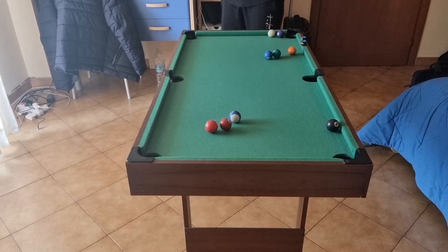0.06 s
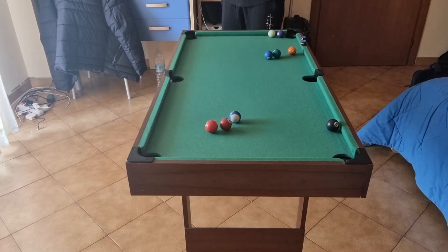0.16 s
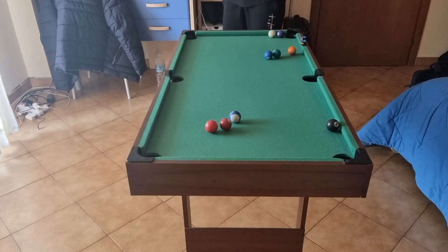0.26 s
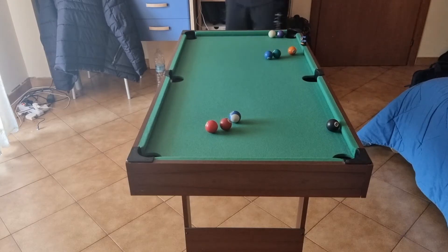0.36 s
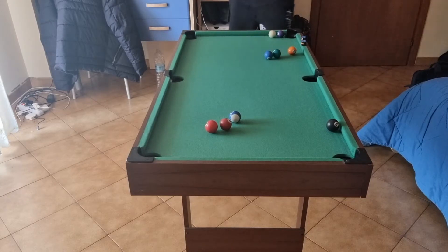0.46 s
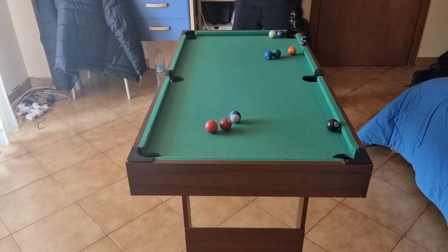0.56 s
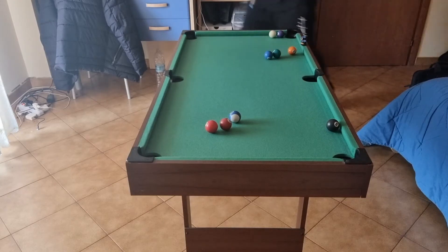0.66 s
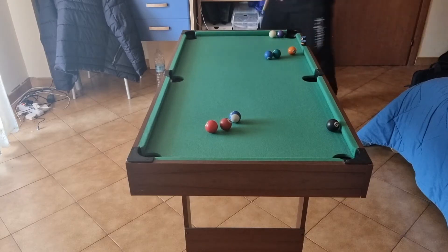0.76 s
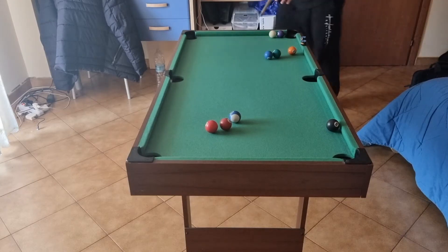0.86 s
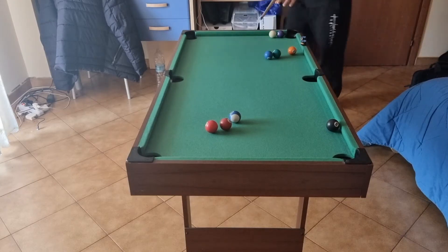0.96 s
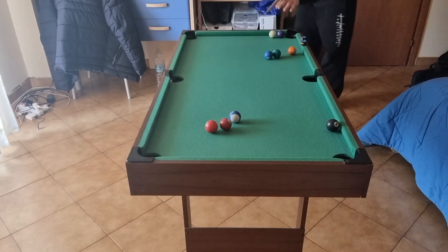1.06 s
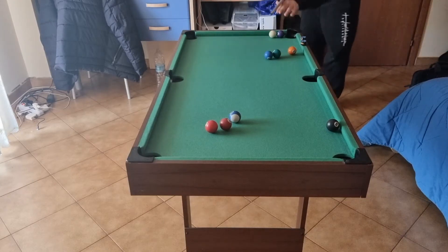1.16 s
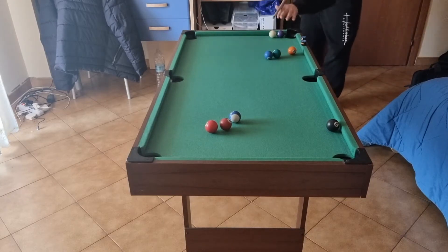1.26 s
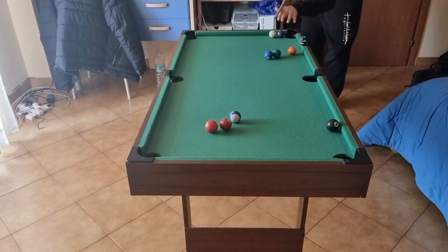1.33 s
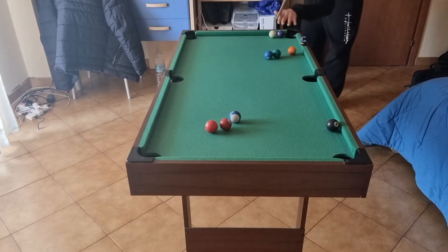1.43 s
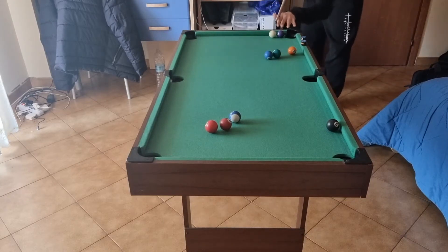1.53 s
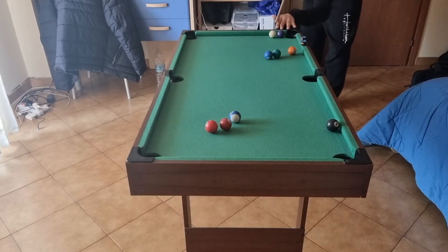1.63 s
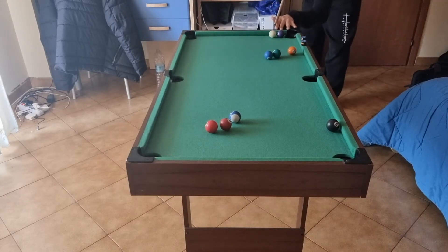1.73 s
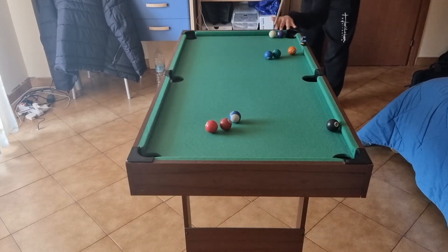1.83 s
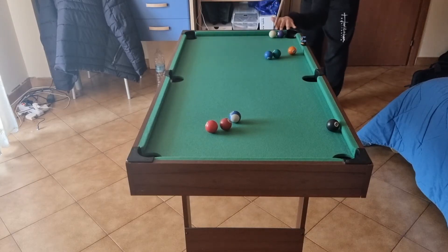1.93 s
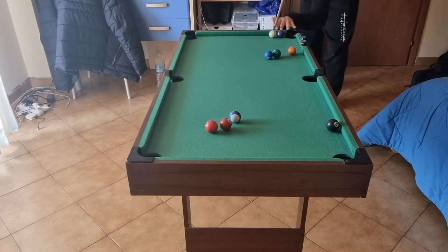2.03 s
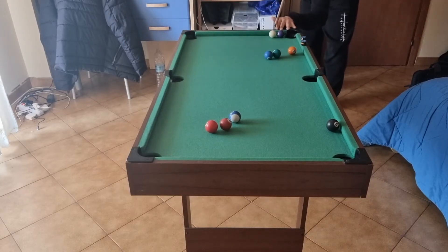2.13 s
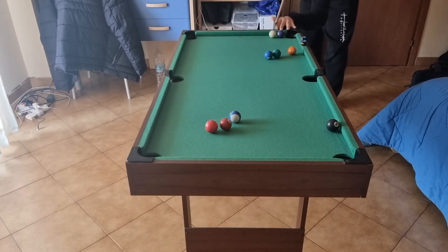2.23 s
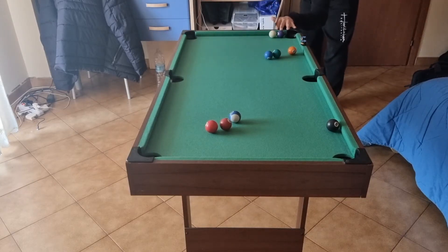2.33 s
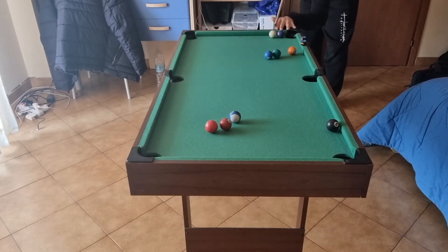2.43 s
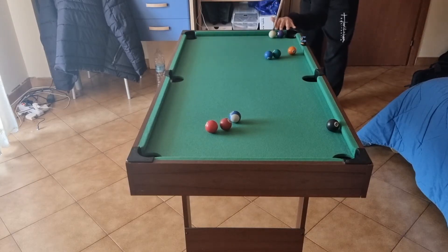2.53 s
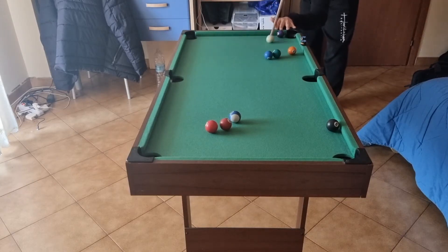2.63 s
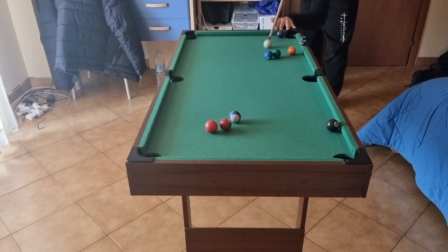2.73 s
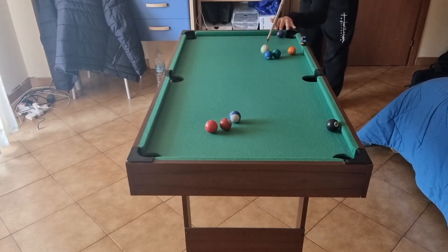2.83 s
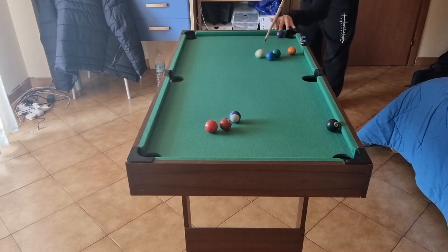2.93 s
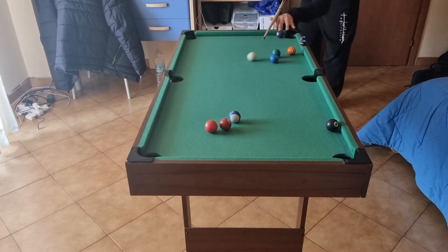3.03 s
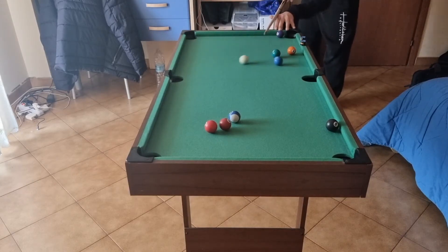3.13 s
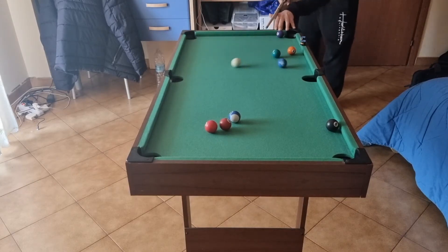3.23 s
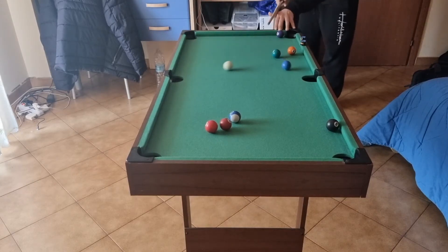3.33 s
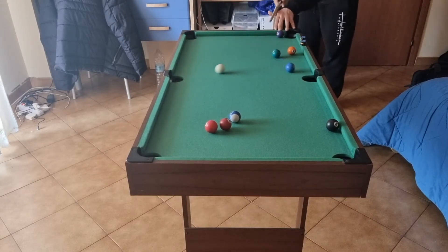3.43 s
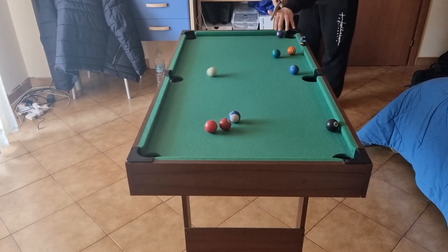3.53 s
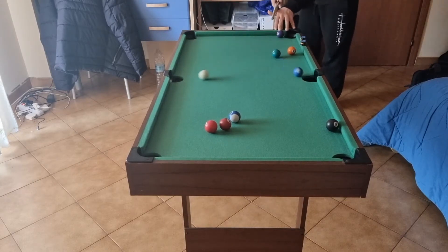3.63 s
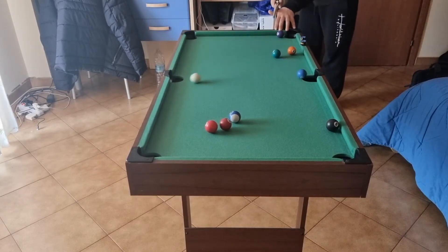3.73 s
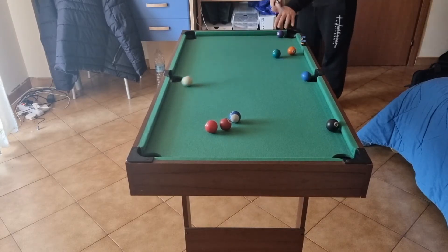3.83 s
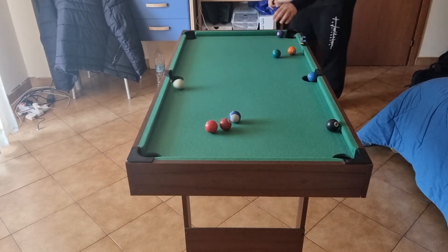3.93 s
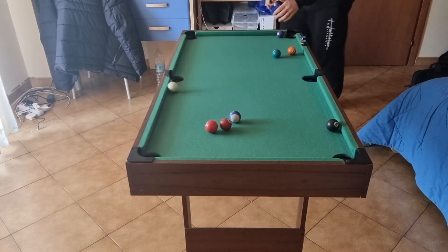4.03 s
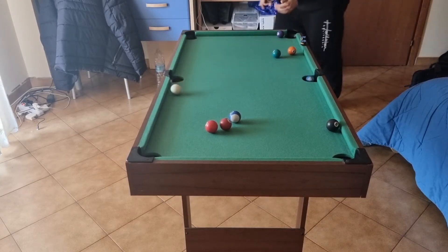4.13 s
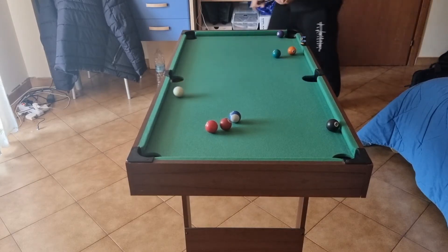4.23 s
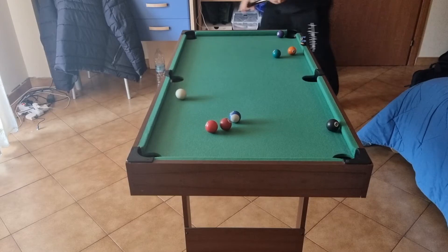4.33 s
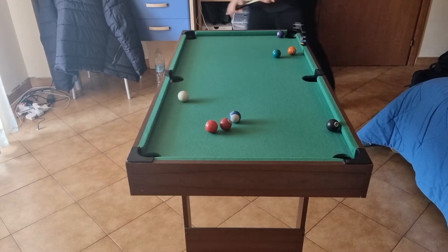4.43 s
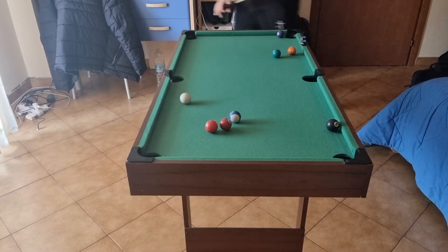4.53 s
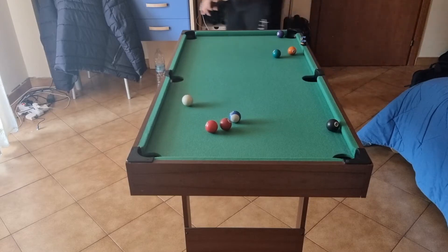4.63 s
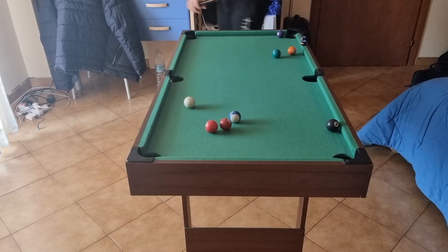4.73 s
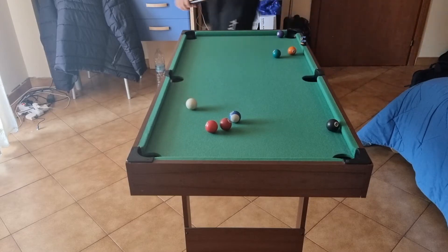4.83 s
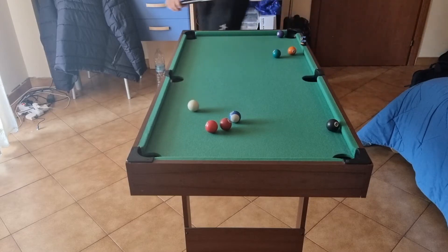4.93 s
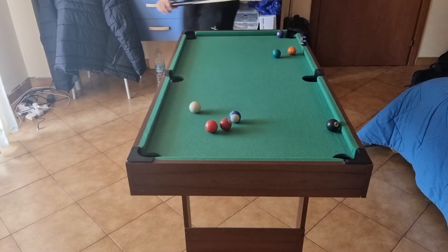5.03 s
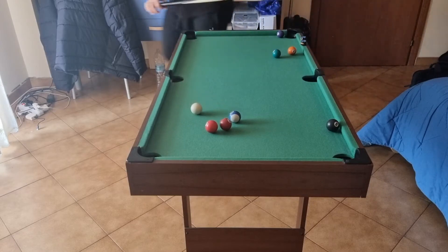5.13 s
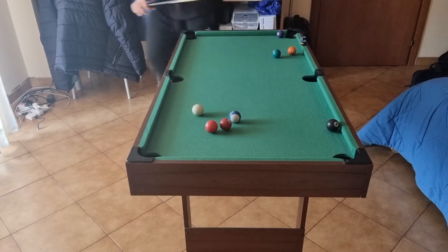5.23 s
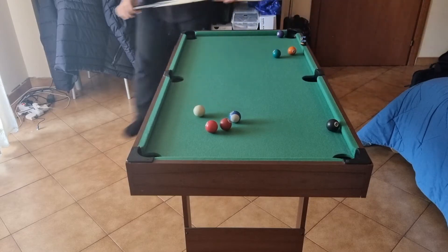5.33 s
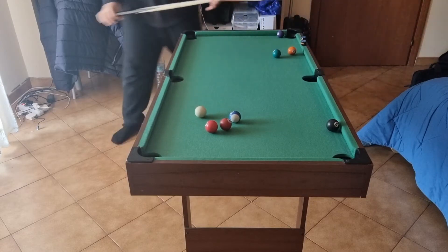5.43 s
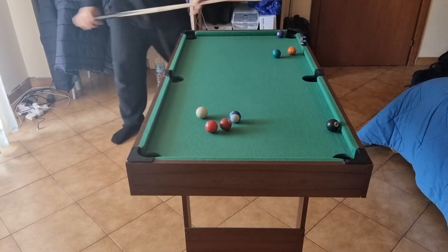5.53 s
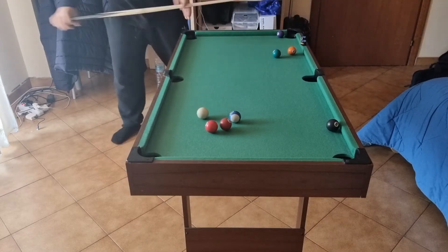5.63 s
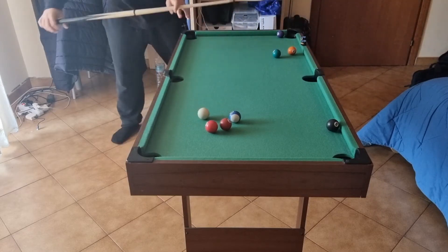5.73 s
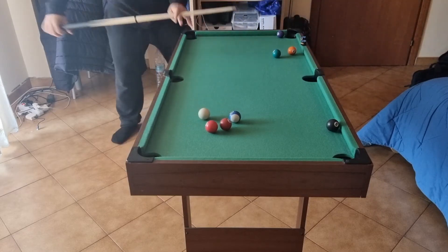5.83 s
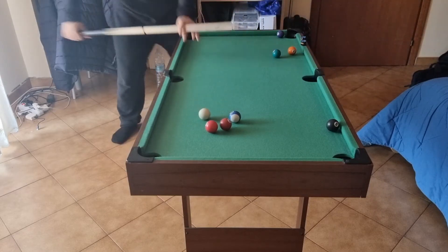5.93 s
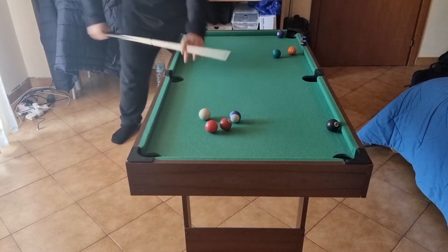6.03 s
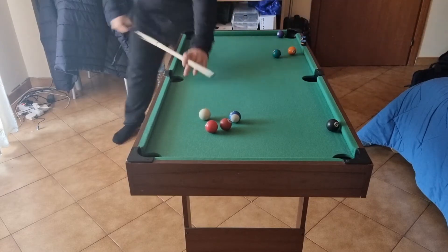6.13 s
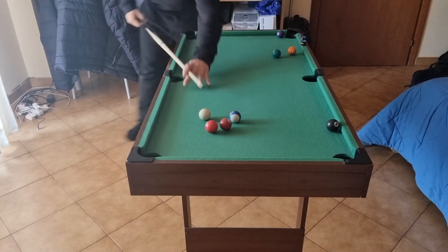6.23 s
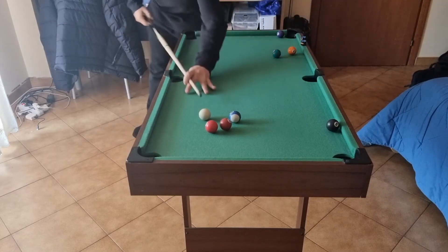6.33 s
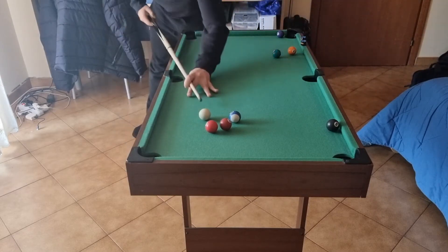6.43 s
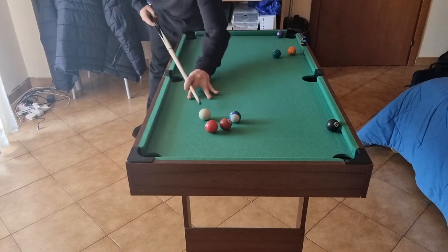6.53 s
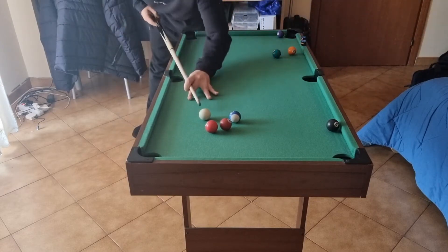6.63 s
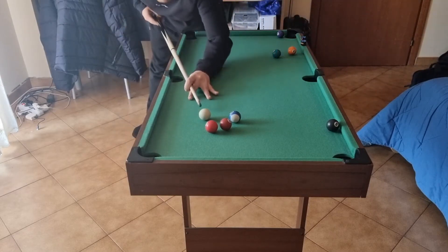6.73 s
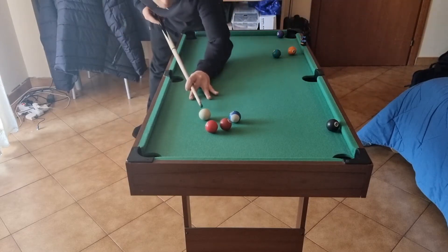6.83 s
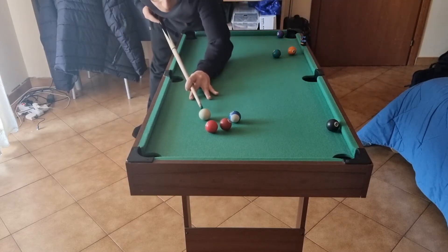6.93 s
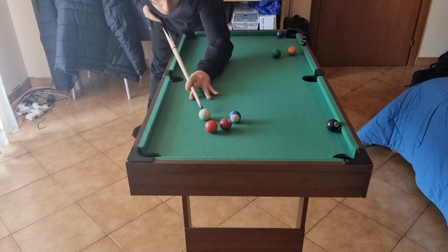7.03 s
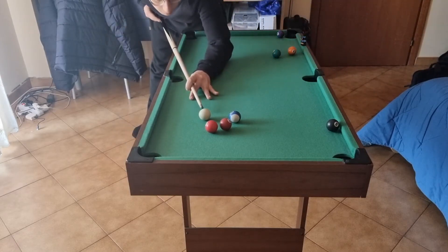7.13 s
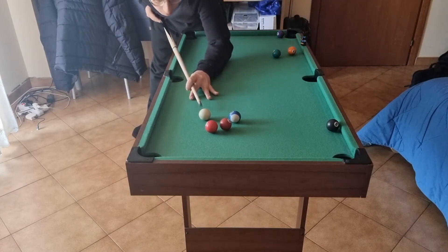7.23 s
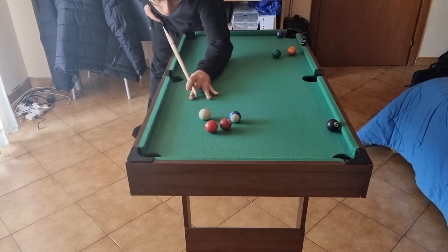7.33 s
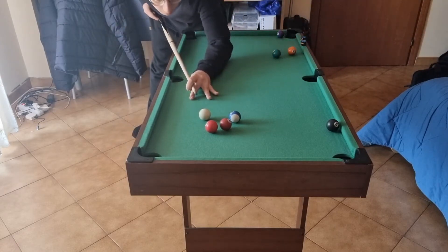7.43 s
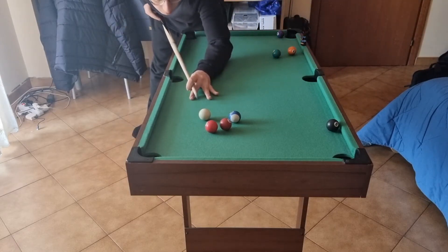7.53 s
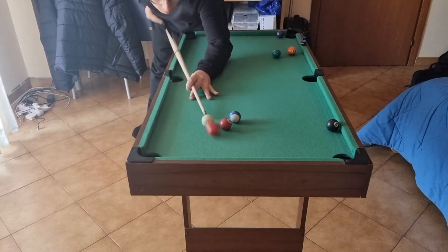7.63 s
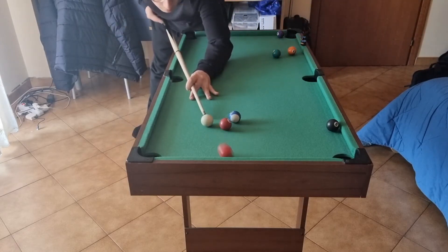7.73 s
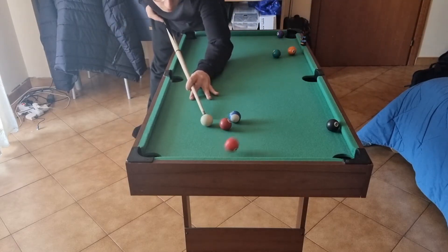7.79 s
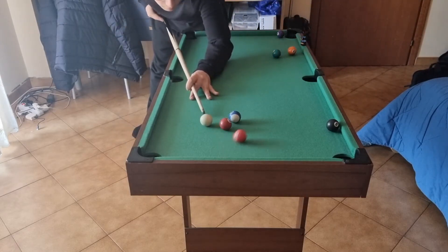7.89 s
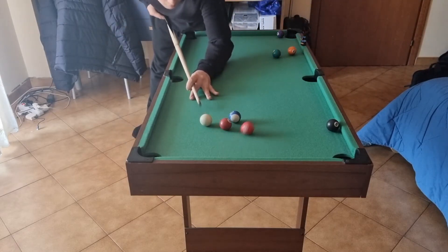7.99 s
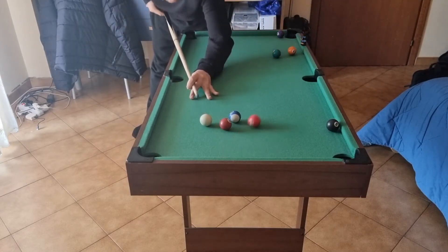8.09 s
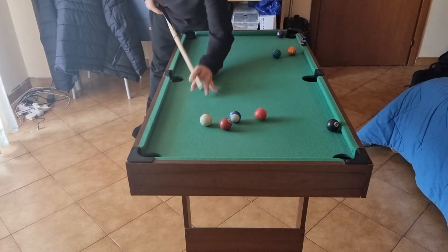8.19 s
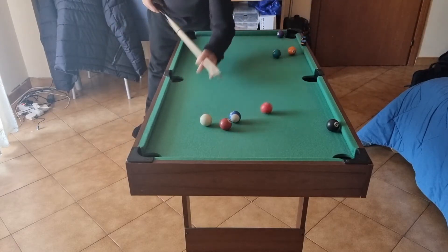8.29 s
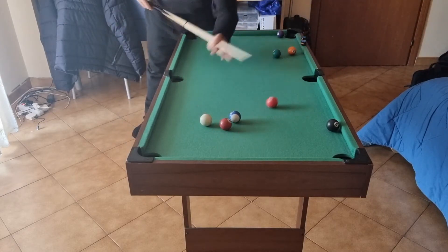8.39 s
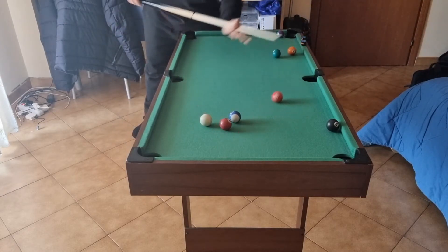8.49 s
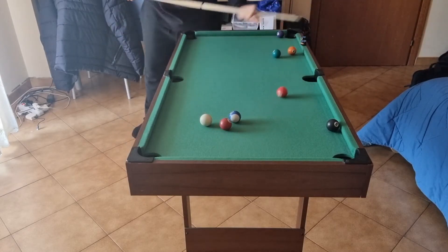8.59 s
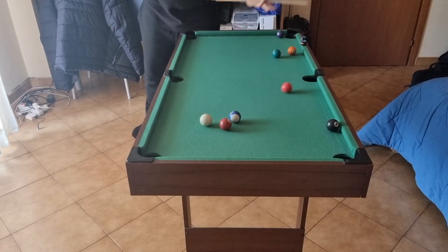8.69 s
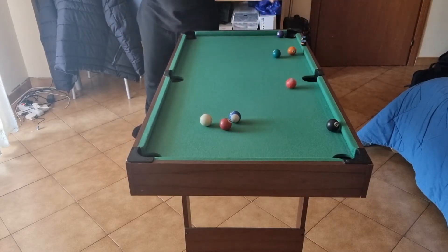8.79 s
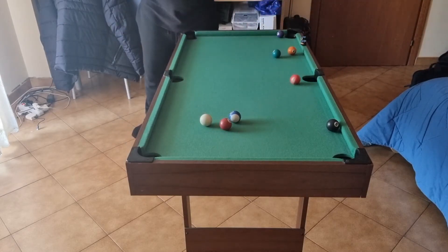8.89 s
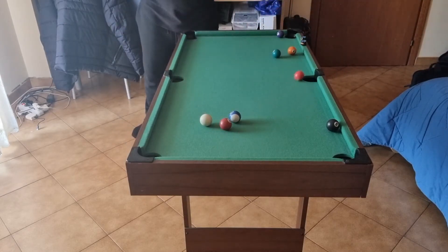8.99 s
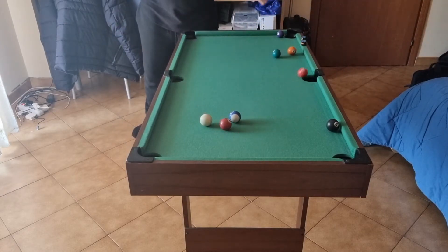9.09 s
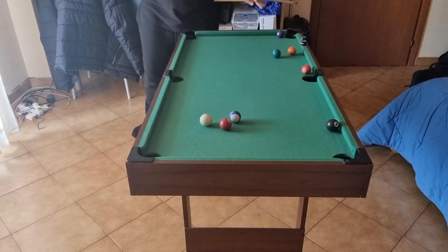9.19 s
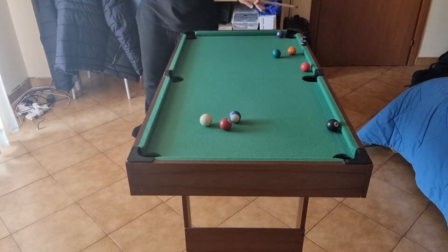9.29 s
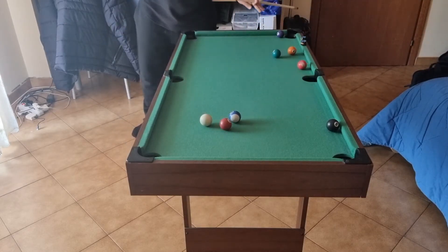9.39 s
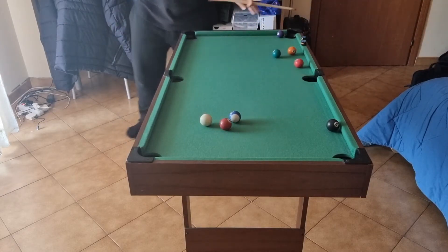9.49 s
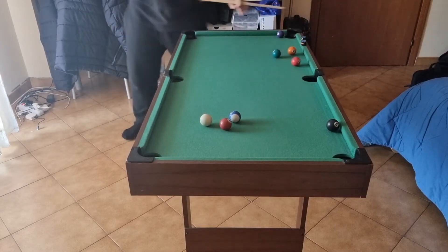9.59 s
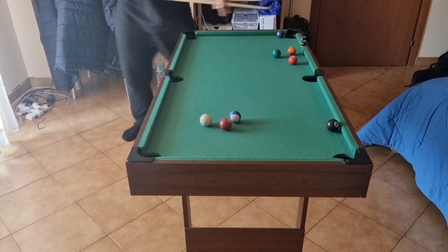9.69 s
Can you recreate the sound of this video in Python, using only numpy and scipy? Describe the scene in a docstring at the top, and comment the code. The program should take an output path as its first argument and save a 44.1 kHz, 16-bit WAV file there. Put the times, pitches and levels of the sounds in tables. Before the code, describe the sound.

A small pool table in a quiet tiled room. A cue tap, soft cloth rolling and a quick double ball click, then a ball clunks into a hollow pocket and knocks along under the wooden bed. Socked feet scuff. A light cue tap leads straight into a very loud, sharp ball crack and a cushion thump, then fading roll. Faint traffic outside; close stereo microphone with short room echo.

```python
"""Two pool shots in a tiled room

Shaped air snaps, ringing wood modes and short noise cracks make the cue taps, ball clicks, cushion blows,
the drop into a pocket and the knocks under the bed of a small wooden table; echoes and a tail follow.
Filtered noise makes rolling balls, sock scuffs on the tiles, one short bright click, still air and traffic
through the window. Wandering lines make the mains hum, one engine and faint far tones.
"""
import sys
import numpy as np
from scipy import signal
from scipy.fft import rfft, irfft
from scipy.io import wavfile
from scipy.ndimage import uniform_filter1d

SR = 44100
rng = np.random.default_rng(int(sys.argv[2]) if len(sys.argv) > 2 else 0)


def generate_wav(signal):
    """Clip the signal to [-1, 1] and save it as 16-bit WAV at the path in sys.argv[1]."""
    frames = np.transpose(np.atleast_2d(signal))
    scaled = np.clip(frames, -1, 1) * 32767
    pcm = np.round(scaled).astype(np.int16)
    wavfile.write(sys.argv[1], SR, pcm)


N = 429975


def gain_of(db):
    """Decibels to an amplitude factor."""
    return 10 ** (np.asarray(db) / 20)


def evened(x):
    """Scales to rms 1."""
    return x / np.sqrt(np.mean(x ** 2) + 1e-20)


def read(points, hz):
    """Reads a spectrum table on a log-frequency axis."""
    point_hz, value = np.transpose(points)
    return np.interp(np.log(hz + 1), np.log(point_hz + 1), value)


def add(mix, start_s, sound):
    """Mixes a sound in at start_s, cut at the end of the mix."""
    part = mix[..., round(start_s * SR):][..., :sound.shape[-1]]
    part += sound[..., :part.shape[-1]]


def correlated(left, other, likeness):
    """Right-channel spectrum that shares the given likeness with the left."""
    return likeness * left + np.sqrt(1 - likeness ** 2) * other


def noise(colour, likeness, patchy_db, length=N, size=1024):
    """Two-channel rms-1 noise from random short-time spectra with drifting patches."""
    hz = np.fft.rfftfreq(size, 1 / SR)
    a, b, c, d, patches = rng.standard_normal((4 * length // size + 5, len(hz), 5)).T
    patches = uniform_filter1d(patches, size=8, axis=0)
    patches = evened(uniform_filter1d(patches, size=12, axis=1))
    same = np.clip(read(likeness, hz), -1, 1)[:, None]
    left = a + 1j * b
    spectra = np.array([left, correlated(left, c + 1j * d, same)])
    spectra *= gain_of(read(colour, hz)[:, None] + patchy_db * patches)
    sound = signal.istft(spectra, nperseg=size, noverlap=3 * size // 4)[1]
    return evened(sound[:, :length])


def fuzzy_tone(hz, width_hz, length, glide_hz=0):
    """An rms-1 line whose strength and phase wander at the speed that its width allows."""
    r = np.exp(-np.pi * width_hz / SR)
    drift = rng.standard_normal(length) + 1j * rng.standard_normal(length)
    drift = signal.lfilter([1], [1, -2 * r, r * r], drift)
    turns = np.cumsum(np.linspace(hz, hz + glide_hz, length)) / SR
    return evened((drift * np.exp(2j * np.pi * turns)).real)


# still air: pitch_hz, relative_db_per_hz
AIR_COLOUR = [(20, -17), (45, -8.5), (75, -14.5), (150, -3), (240, -12), (360, -10.5), (630, -23.5),
              (1100, -18), (1600, -35.5), (3000, -39), (6000, -46.5), (9500, -51.5), (12500, -47.5),
              (15500, -47.5)]
# left-right likeness of background noise: pitch_hz, likeness
AIR_LIKENESS = [(60, .95), (240, .9), (900, 0), (4000, 0.23), (9000, .8)]
# mains hum: pitch_hz, width_hz, level_db
HUM = [(53.5, 4.4, -82), (103, 5.2, -69.5)]
# faint wavering tones: start_s, length_s, pitch_hz, glide_hz, width_hz, level_db
TONES = [(0.3, 0.82, 996, 2, 69, -79), (1.309, 0.19, 964, 3, 5.2, -77.5), (1.555, 0.35, 549, -3.5, 30, -82),
         (1.599, 0.23, 1130, 3, 26, -81), (3.103, 0.45, 1138, 0.5, 8.2, -81.5),
         (6.648, 0.062, 2370, 5, 74, -78), (8.949, 0.47, 1006, 50, 60, -77.5),
         (9.002, 0.75, 1992, 62, 40, -85), (9.286, 0.18, 1998, 44, 48, -77.5),
         (9.371, 0.33, 1070, -29.5, 24, -78.5)]
AIR_DB = -70


def background():
    """Still air is shaped noise; mains hum and far tones are narrow wandering lines."""
    out = gain_of(AIR_DB) * noise(AIR_COLOUR, AIR_LIKENESS, 0.56)
    for hz, width_hz, db in HUM:
        out += gain_of(db) * fuzzy_tone(hz, width_hz, N)
    for start_s, length_s, hz, glide_hz, width_hz, db in TONES:
        size = round(length_s * SR)
        tone = fuzzy_tone(hz, width_hz, size, glide_hz)
        add(out, start_s, gain_of(db) * tone * signal.windows.tukey(size, .4))
    return out


def stretch(start_s, end_s, soft):
    """A window open over a span of time, with soft ends."""
    out = np.zeros(N)
    add(out, start_s, signal.windows.tukey(round((end_s - start_s) * SR), soft))
    return out


# vehicles passing outside: nearest_s, half_time_s, tyre_db, rumble_db
PASSES = [(0.019, 0.34, -84.5, -66.5), (.75, 0.47, -80, -77.5), (6.4, 0.2, -67, -83.5),
          (7.0, .3, -62.5, -83), (9.049, 1.4, -74, -72)]
# tyre noise: pitch_hz, relative_db_per_hz
STREET_COLOUR = [(80, -23), (150, 1), (260, -7.5), (400, -6.5), (550, -12.5), (1140, -9), (1600, -18),
                 (3000, -26.5), (6000, -44.5), (9000, -77.5)]
# engine harmonics: multiple, level_db
ENGINE = [(2, -70.5), (5, -71), (6, -73), (10, -77.5), (13, -77.5), (15, -80), (16, -76)]
STREET_DB, RUMBLE_DB = -84.5, -79.5  # distant traffic between passes
ENGINE_START_S, ENGINE_END_S = 6.25, 7.3
ENGINE_HZ, ENGINE_WIDTH_HZ, ENGINE_DROP_HZ = 72.5, 0.86, 1.53  # pitch sinks as the engine passes
SHAKE_START_S, SHAKE_END_S, SHAKE_DB = 4.08, 4.94, -58.5  # ball running down the tray shakes the frame


def street():
    """Tyres and rumble swell with nearness; an engine drones in harmonics; frame shake joins the rumble."""
    nearest_s, half_time_s, tyre_db, rumble_db = np.transpose(PASSES)[..., None]
    near = 1 / (1 + ((np.arange(N) / SR - nearest_s) / half_time_s) ** 2)
    tyres = gain_of(STREET_DB) + (near * gain_of(tyre_db)).sum(0)
    rumble = gain_of(RUMBLE_DB) + (near * gain_of(rumble_db)).sum(0)
    rumble += gain_of(SHAKE_DB) * stretch(SHAKE_START_S, SHAKE_END_S, 0.75)
    rumble_colour = [(15, -19.0), (30, -10.5), (55, 6.0), (80, -4.0), (140, -60.5)]
    out = rumble * noise(rumble_colour, AIR_LIKENESS, 2.2, size=2048)
    out += tyres * noise(STREET_COLOUR, AIR_LIKENESS, 1.5, size=4096)

    size = round((ENGINE_END_S - ENGINE_START_S) * SR)
    drone = np.zeros(size)
    for k, db in ENGINE:
        drone += gain_of(db) * fuzzy_tone(k * ENGINE_HZ, k * ENGINE_WIDTH_HZ, size, -k * ENGINE_DROP_HZ)
    add(out, ENGINE_START_S, drone * signal.windows.tukey(size, .4))
    return out


# sock scuffs on tile, and one short bright click at 7.76 s:
# start_s, length_s, rise_s, level_db, tilt_db_per_octave
SCUFFS_AND_CLICK = [(0.364, 0.18, 0.082, -82, 5), (.643, 0.084, .007, -81, 10),
                    (0.759, 0.49, 0.1, -64.5, 5.5), (3.82, 0.037, 0.011, -74, -1),
                    (4.72, 0.41, 0.13, -70.5, 6), (5.234, 0.27, 0.2, -63.5, 6.5),
                    (5.993, 0.31, .012, -83, 6), (6.09, 0.3, 0.28, -63, 7.5),
                    (7.762, 0.028, .002, -54.5, 1)]
# hiss before tilt: pitch_hz, relative_db_per_hz
HISS_COLOUR = [(880, -55), (1500, 1.5), (1930, 1), (3180, -0.5), (5240, -6.5), (10100, -26), (15500, -33.5)]
LIFT_SHARE = 0.48  # share of each event in which the pressure lifts off


def scuffs_and_click():
    """Sock scuffs are a fine hiss that follows the foot's pressure; one short bright click is shaped alike."""
    out = np.zeros((2, N))
    for start_s, length_s, rise_s, db, tilt_db in SCUFFS_AND_CLICK:
        t = np.arange(0, length_s + 0.21, 1 / SR)
        press = t / max(rise_s, 1 / SR)
        lift = (length_s - t) / (LIFT_SHARE * length_s)
        pressure = np.clip(np.minimum(press, lift), 0, 1) ** 1.43
        # the room carries it on briefly
        pressure = signal.lfilter([.0015], [1, .0015 - 1], pressure ** 2) ** .5
        colour = [(hz, density_db + tilt_db * np.log2(hz / 4000)) for hz, density_db in HISS_COLOUR]
        hiss = noise(colour, [(1000, 0.15), (8000, 0.43)], 2.7, len(t), size=512)
        add(out, start_s, gain_of(db) * pressure * hiss)
    return out


# room decay: pitch_hz, t60_s
ROOM_T60 = [(80, 0.22), (250, 0.34), (700, 0.31), (2000, 0.31), (4000, 0.29), (8000, 0.3), (14000, 0.04)]
# left-right likeness of the room: pitch_hz, likeness
ROOM_LIKENESS = [(100, .95), (300, .85), (600, .35), (3000, .15), (9000, .8)]
# echo off the bed: left_db, right_db
BOUNCE_DB = (-8, -5)
# first wall echo: late_ms, left_db, right_db
WALL_ECHO = (20, -10.5, -8)
BOUNCE_IN_TAIL = 0.23  # share of the bed bounce that reaches the walls


def room(sound, room_db, late_ms, bounce_ms, balance_db=0):
    """Direct sound, first echoes from bed and wall, and a tail of sparse taps dying band by band."""
    length = SR // 2
    taps = np.zeros((2, length))
    at = np.arange(0, length - 20, 20) + rng.integers(0, 20, (2, (length - 1) // 20))
    np.put_along_axis(taps, at, rng.choice([-1., 1.], at.shape), 1)
    hz, t, spectra = signal.stft(taps, SR, nperseg=512)
    same = np.clip(read(ROOM_LIKENESS, hz), 0, 1)[:, None]
    spectra = np.array([spectra[0], correlated(spectra[0], spectra[1], same)])
    spectra *= gain_of(-60 * t / read(ROOM_T60, hz)[:, None])
    tail = signal.istft(spectra, SR, nperseg=512)[1][:, :length]
    tail *= 1 - np.exp(-(np.arange(length) / SR / .0035) ** 2)  # reflections take some ms to build up

    has_bounce = bounce_ms > 0  # none from under the bed
    if has_bounce:
        lag = max(round(bounce_ms * SR / 1000), 1)
        tail[:, lag:] += BOUNCE_IN_TAIL * tail[:, :-lag]
    response = tail / np.linalg.norm(tail[0])
    wall_ms, wall_left_db, wall_right_db = WALL_ECHO
    response[:, round(wall_ms * SR / 1000)] += gain_of([wall_left_db, wall_right_db])
    response *= gain_of(room_db)

    paths = [(0, balance_db / 2, -balance_db / 2)]
    if has_bounce:
        paths.append((bounce_ms, *BOUNCE_DB))
    for ms, left_db, right_db in paths:
        response[0, round(ms * SR / 1000)] += gain_of(left_db)
        response[1, round((ms + abs(late_ms)) * SR / 1000)] += gain_of(right_db)
    return signal.fftconvolve(sound[None], response, axes=1)


# balls rolling: start_s, length_s, level_db, fade_db_per_s
ROLLING = [(2.57, 0.8, -56.5, 28), (4.1, .6, -55.5, -1), (7.64, 0.27, -52.5, -8.5), (7.87, 0.63, -56.5, 25)]


def rolling():
    """Balls rolling on the cloth, and one along the tray under the bed: a low lumpy rumble."""
    gain = np.zeros(N)
    for start_s, length_s, db, fade_db_per_s in ROLLING:
        t = np.arange(0, length_s, 1 / SR)
        ends = np.clip(np.minimum(t, length_s - t) / .0067, 0, 1)
        add(gain, start_s, gain_of(db - fade_db_per_s * t) * ends)
    colour = [(40, -20.5), (110, 3.5), (270, -1.5), (520, -9.0), (1200, -20.0), (2800, -53.0)]
    return gain * noise(colour, ROOM_LIKENESS, patchy_db=2.5)


def snap(hz, cycles):
    """A ball that stops suddenly jerks the air: a smooth swing in and out."""
    u = np.arange(SR // 3) / SR * hz - 2.8 * cycles
    return np.sin(2 * np.pi * u) * np.exp(-(u / cycles) ** 2)


# modes of the wooden bed and frame: pitch_hz, level_db, t60_s
BED = [(115, -13.5, 0.11), (180.5, -3.5, 0.075), (263, -5, 0.035), (323, -5.5, 0.07), (403.3, -4, 0.039),
       (521, 2, 0.025), (565, -6, 0.075), (679, 2.5, 0.029), (881, -4.5, 0.05), (1124.4, -2, 0.041),
       (1395, -9, 0.026), (1730, -11, 0.014), (2310, -16, 0.032), (2770, -11.5, 0.039)]


def ring(modes, contact_ms, dull_hz, rise_cycles):
    """A push rings the modes, each a close cluster of three, to peak 1; longer contact is duller."""
    t = np.arange(SR // 3) / SR
    hz, db, t60_s = (np.repeat(column, 3, axis=0)[:, None] for column in np.transpose(modes))
    index = np.arange(len(hz))[:, None]
    flank = index % 3 - 1  # 0 is the main mode
    hz = hz * (1 + .05 * flank * rng.uniform(0.97, 2.3, hz.shape))
    db = db - 6 * abs(flank)  # neighbours are weaker and fall elsewhere at every blow
    reach = hz ** 2 / (hz ** 2 + dull_hz ** 2) * np.exp(-(hz * contact_ms / 2000) ** 2)
    rise = 1 - np.exp(-(t * hz / rise_cycles) ** 2)
    turn = np.where(flank, rng.random(hz.shape), index % 2 / 2)  # main modes alternate in sign
    swing = np.sin(2 * np.pi * (hz * t + turn))
    body = (reach * rise * gain_of(db - 60 * t / t60_s) * swing).sum(0)
    # no steady push is radiated
    body = signal.lfilter(*signal.butter(2, dull_hz / 3, "high", fs=SR), body)
    return body / abs(body).max()


def crack_noise(top_hz, narrow_db):
    """A short dense burst around top_hz, its spectrum evened so chance leaves no holes in its colour."""
    t, octaves = np.arange(2048) / SR, np.arange(-3, 4, .5)
    colour_db = -narrow_db * octaves ** 2 - 6 * np.maximum(octaves, 0)
    colour = np.transpose([top_hz * 2. ** octaves, colour_db])
    burst = noise(colour, ROOM_LIKENESS, 0, length=len(t), size=256)[0]
    fade = gain_of(-60 * t / .016) * (1 - np.exp(-t / .002))
    phase = np.angle(rfft(fade * burst))
    even = irfft(gain_of(read(colour, np.fft.rfftfreq(len(t), 1 / SR))) * np.exp(1j * phase))
    even *= np.sqrt(fade)
    return even * np.linalg.norm(fade) / np.linalg.norm(even)


def blows(table, modes, rise_cycles, dull_hz, late_ms, narrow_db, crack_hz, soften, room_db):
    """Each blow snaps the air, rings its object and adds a crack, mostly lower for longer contact;
    cue cracks keep nearly one pitch."""
    out = np.zeros((2, N))
    for start_s, db, contact_ms, snap_db, crack_db, *bounce_ms in table:
        sound = ring(modes, contact_ms, dull_hz, rise_cycles)
        sound += gain_of(snap_db) * snap(1000 / contact_ms, 0.45)
        crack = crack_noise(crack_hz / contact_ms ** soften, narrow_db)
        sound[:len(crack)] += gain_of(crack_db) * crack
        add(out, start_s, gain_of(db) * room(sound, room_db, late_ms, sum(bounce_ms)))
    return out


# ball on tray: start_s, level_db, contact_ms, snap_db, crack_db
KNOCKS = [(4.172, -36.5, 0.85, -6, -29), (4.644, -34, 0.68, -30, -3.5), (4.838, -46, 1.8, -18, -27),
          (5.117, -32.5, 0.78, -18.5, -15.5), (5.295, -55, 3.5, -11, -33)]


def knocks():
    """A ball knocking about under the bed rings the wood, with no bounce off the bed."""
    return blows(KNOCKS, BED, 0.68, 520, 0.068, narrow_db=15.5, crack_hz=1980, soften=0.91, room_db=3.0)


# ball in pocket: start_s, level_db, contact_ms, snap_db, crack_db
DROPS = [(4.071, -39, 0.57, -15, -18), (4.084, -23, 0.57, -15.5, -12.5), (4.264, -29, 0.86, -27, -19),
         (4.403, -35.5, 0.8, -11.5, -18), (4.503, -41.5, 1.2, -0.5, -17)]
# modes of the hollow pocket: pitch_hz, level_db, t60_s
POCKET = [(118.7, -8, 0.098), (178, -10.5, 0.091), (273.4, 1, 0.057), (322, -2, 0.032), (408, -12.5, 0.053),
          (520, -8.5, 0.066), (723, 0, 0.015), (1037, -10.5, 0.02)]
POCKET_RISE_CYCLES = 3.6


def drops():
    """A ball dropping into the hollow pocket rings modes that take a few cycles to swell."""
    return blows(DROPS, POCKET, POCKET_RISE_CYCLES, 28, 0.13,
                 narrow_db=6.5, crack_hz=2100, soften=0.36, room_db=-1.5)


# ball on cushion: start_s, level_db, contact_ms, snap_db, crack_db, bounce_ms
CUSHIONS = [(7.8714, -15, 0.92, 0.8, -10, .825), (9.297, -60, 3.6, 3.5, -40, 0.54)]


def cushions():
    """A ball pushing into a cushion rings the bed and frame."""
    return blows(CUSHIONS, BED, 0.81, 180, .04, narrow_db=8.5, crack_hz=2260, soften=0.2, room_db=3.0)


# cue tip on ball: start_s, level_db, contact_ms, snap_db, crack_db, bounce_ms
CUE_TAPS = [(2.5545, -19, 1, 1, -6, .36), (7.6318, -30, .75, 10.5, 1, .75)]


def cue_taps():
    """The cue tip striking a ball snaps the air and rings the bed."""
    return blows(CUE_TAPS, BED, 0.37, 330, .01, narrow_db=8.5, crack_hz=4400, soften=-0.047, room_db=1.5)


# ball on ball: start_s, level_db, pitch_hz, room_db, left_right_db, right_late_ms, bounce_ms
CLICKS = [(2.9193, -14, 3400, -1, 3, .1, .62), (2.9262, -17, 3400, -3, 5, .1, .62),
          (7.66005, -.3, 3600, -5, -.5, 0, .825)]
OVERTONE_DB, THUD_DB = -23.5, -33.5


def clicks():
    """Hard balls give a short high snap with a thin overtone; the bed thuds under them."""
    out = np.zeros((2, N))
    for start_s, db, hz, room_db, balance_db, late_ms, bounce_ms in CLICKS:
        sound = snap(hz, 0.73) + gain_of(OVERTONE_DB) * snap(1.8 * hz, 1.6)
        sound += gain_of(THUD_DB) * ring(BED, 0.35, 150, 0.26)
        add(out, start_s, gain_of(db) * room(sound, room_db, late_ms, bounce_ms, balance_db))
    return out


def scene():
    """Play on the table over the sounds of the room."""
    surroundings = background() + street() + scuffs_and_click()
    play = rolling() + knocks() + drops() + cushions() + cue_taps() + clicks()
    return surroundings + play


EDGE_HZ = 15750


def record(dry):
    """Band limit: a steep linear-phase low-pass at EDGE_HZ."""
    low_pass = signal.firwin(511, EDGE_HZ, window=("kaiser", 9), fs=SR)
    return signal.oaconvolve(dry, low_pass[None], "same")


dry = scene()
out = record(dry)
generate_wav(out)
```